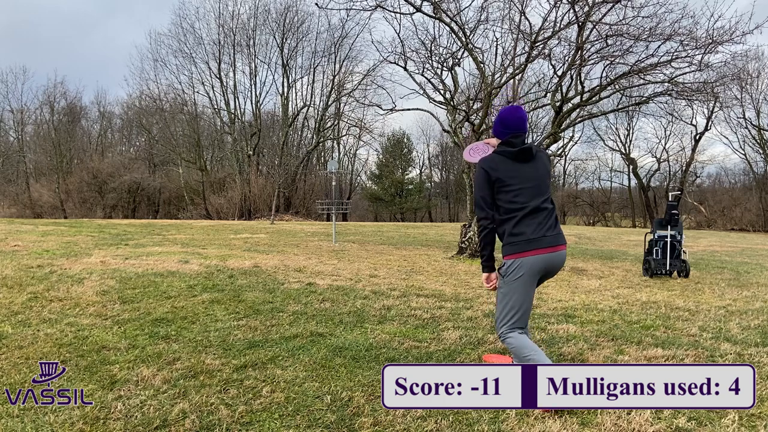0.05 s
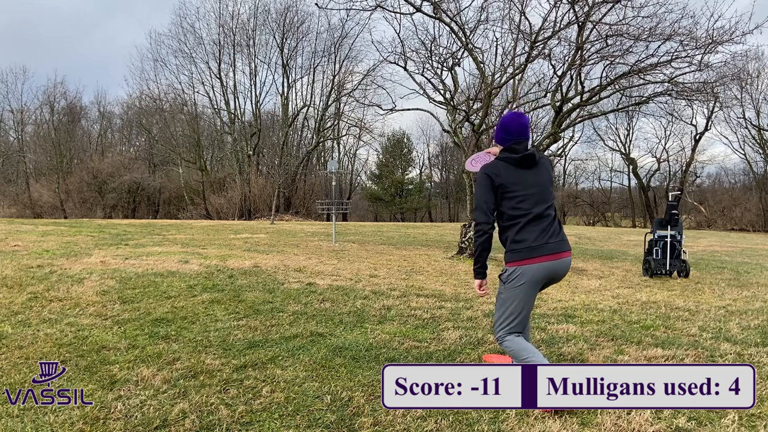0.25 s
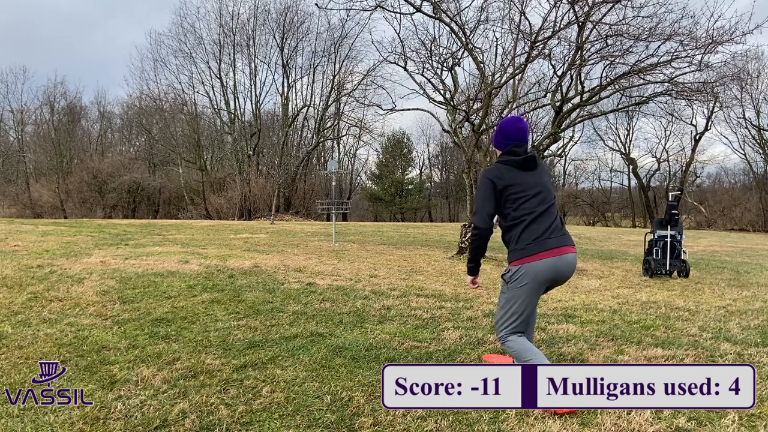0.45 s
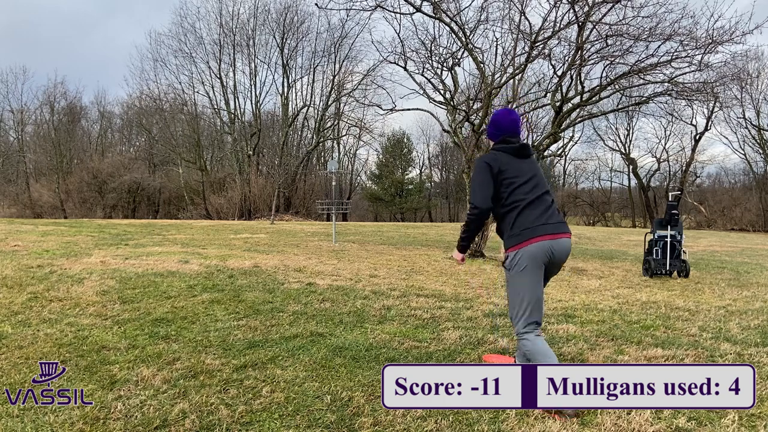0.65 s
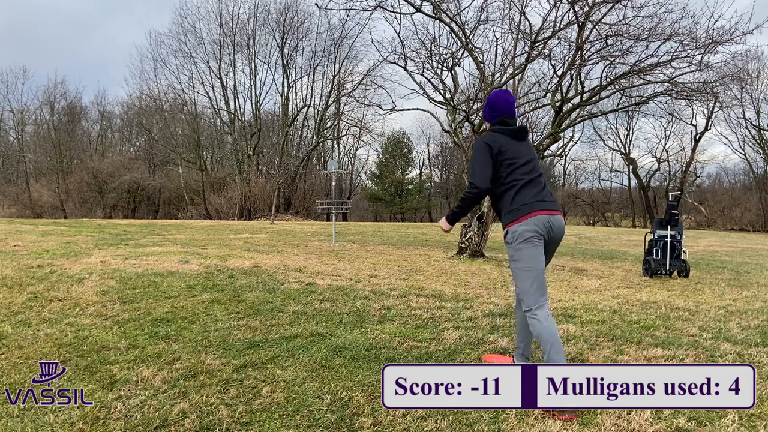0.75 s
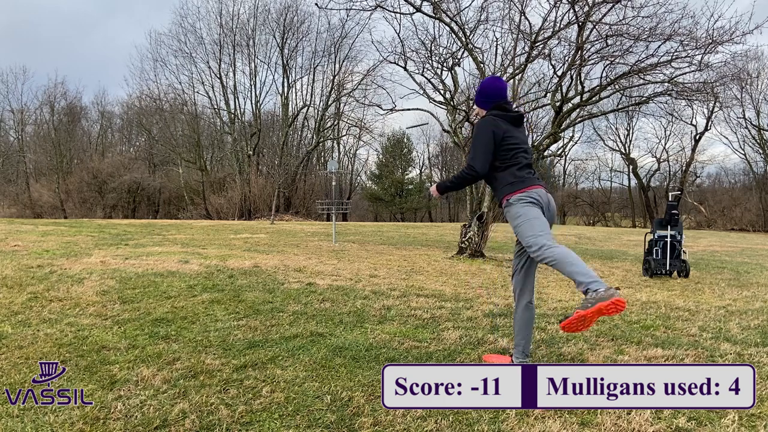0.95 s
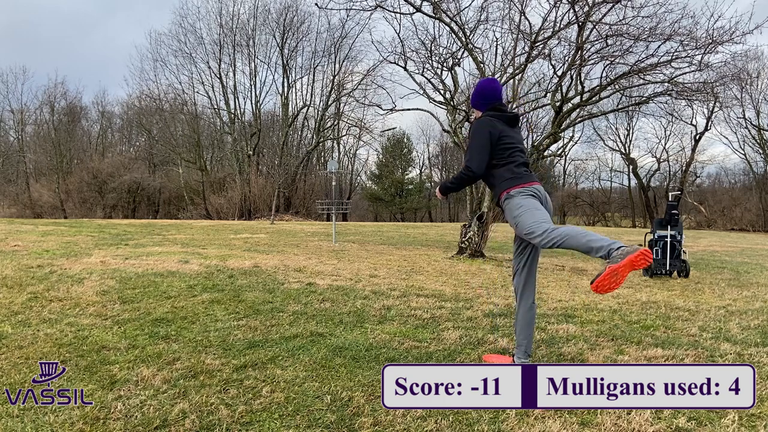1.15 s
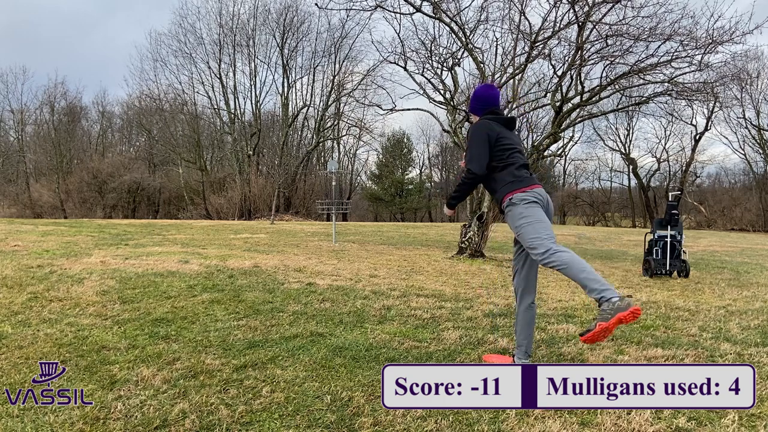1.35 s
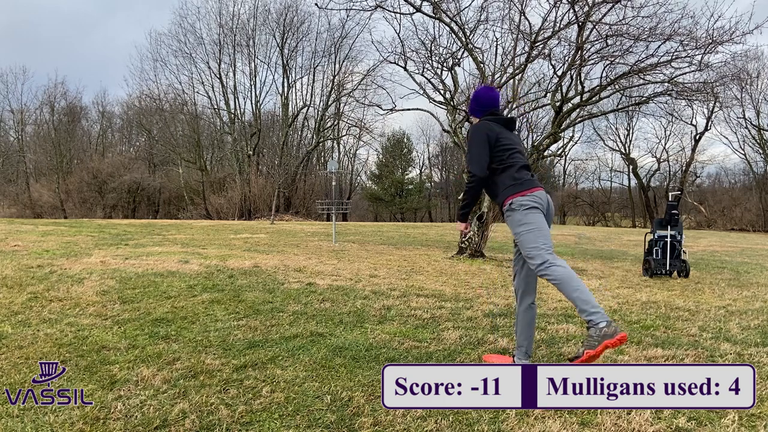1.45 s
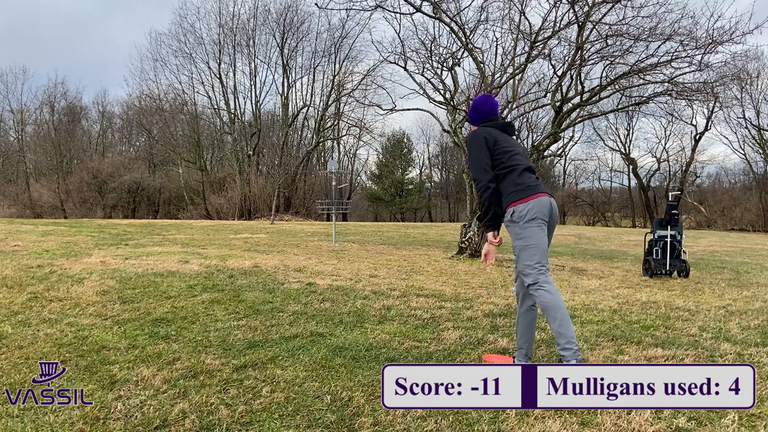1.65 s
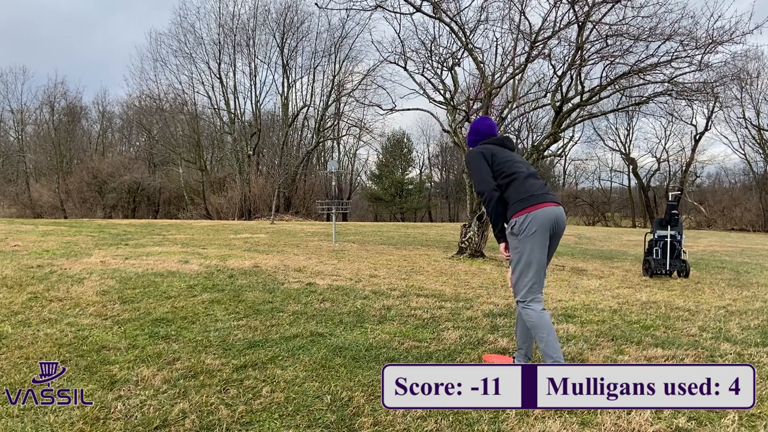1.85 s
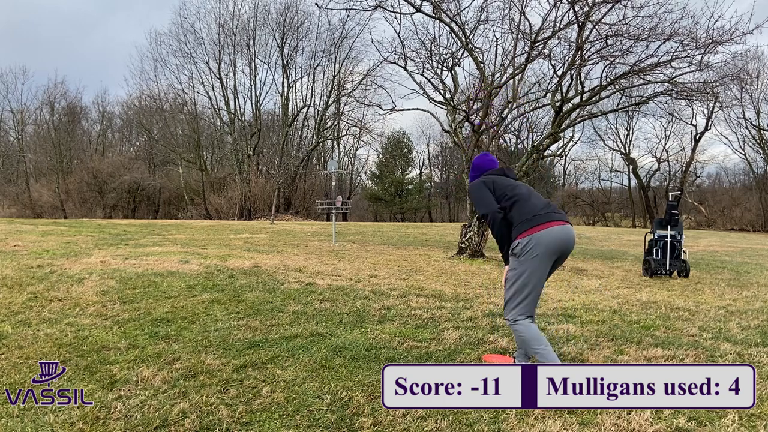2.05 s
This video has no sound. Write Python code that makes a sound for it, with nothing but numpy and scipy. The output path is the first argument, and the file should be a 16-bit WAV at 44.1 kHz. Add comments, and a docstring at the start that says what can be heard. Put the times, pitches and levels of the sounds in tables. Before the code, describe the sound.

A plastic disc hitting the chains of a metal basket is the main sound. From the start, wind rumbles on the microphone in an open field. The thrower's clothes rustle and tick faintly from about 0.6 to 1.2 seconds. At about 1.7 seconds the disc thuds into the chains some way off; they clatter and jingle, the pole rings, and lighter clinks continue until about 2.1 seconds.

```python
"""A thrown disc hits the chains of a metal basket some way off in an open field.
From the start, wind rumbles on a microphone with two ports (openings for sound). The thrower's
clothes brush softly, then rustle and tick faintly. At about 1.7 seconds the plastic disc thuds
into the chains. The links knock together, so they clatter, jingle and clink, and a moment
later they strike the pole and make it ring."""
import sys
import numpy as np
from scipy import signal
from scipy.fft import rfft, irfft
from scipy.io import wavfile
from scipy.ndimage import uniform_filter1d

SR = 44100
rng = np.random.default_rng(int(sys.argv[2]) if len(sys.argv) > 2 else 0)


def master_out(mix):
    """Clip the mix to full scale and print it as 16-bit PCM to the path in sys.argv[1]."""
    frames = np.transpose(np.atleast_2d(mix))
    ceiling = np.clip(frames, -1, 1)
    pcm = np.round(ceiling * 32767).astype(np.int16)
    wavfile.write(sys.argv[1], SR, pcm)


N = 92610
HIT_S = 1.7185
JINGLE_PER_S, JINGLE_SPREAD_DB = 220, 0.5

# The disc's firm knocks. Each row: start in seconds, relative level in dB.
FIRM_KNOCKS = [(1.7192, -23.5), (1.7444, -21.5), (1.771, -22.5), (1.781, -22), (1.811, -38)]
# How hard the links jostle. Each row: time in seconds, clatter gain in dB, jingle gain in dB.
JOSTLE = [(1.717, -37, -56), (1.723, -43.5, -55), (1.731, -40, -33), (1.745, -37, -48), (1.765, -39.5, -30),
          (1.775, -34, -26.5), (1.805, -45, -24), (1.879, -48, -38.5), (1.907, -53, -36.5),
          (2.011, -58.5, -43.5), (2.021, -54, -32), (2.049, -53, -42), (2.063, -48.5, -33),
          (2.073, -41, -37), (2.085, -48.5, -34), (2.1, -40, -34)]


def amp(db):
    return 10 ** (np.asarray(db) / 20)


def unit_level(x):
    """Scale a sound so that its average power is 1."""
    return x / np.sqrt(np.mean(x ** 2) + 1e-20)


def gain_curve(table, column=1):
    """Join a table's dB values with straight lines in time and turn them into a gain."""
    rows = np.array(table)
    return amp(np.interp(np.arange(N) / SR, rows[:, 0], rows[:, column]))


def colour(x, points):
    """Shape the tone. Each point: frequency in Hz, gain in dB."""
    hz, db = np.transpose(points)
    log_hz = np.log(np.fft.rfftfreq(N, 1 / SR) + 1)
    return irfft(rfft(x) * amp(np.interp(log_hz, np.log(hz + 1), db)), N)


def ring(hz, db, fade_s, rise_s=.0004):
    """A struck tone: it swells during the contact, then falls 60 dB in its fade time."""
    t = np.arange(SR // 2) / SR
    onset = 1 - np.exp(-t / rise_s)
    return onset * amp(db - 60 * t / max(fade_s, .0001)) * np.sin(2 * np.pi * hz * t)


def knocks(per_s, spread_db):
    """Clicks at random times; a wider spread makes a few stand out."""
    size = amp(spread_db * np.minimum(rng.exponential(1, N), 4)) * rng.choice([-1., 1.], N)
    return unit_level(size * (rng.random(N) < per_s / SR))


def after_hit():
    return np.arange(N) >= HIT_S * SR


def wind():
    """Air blows over both ports as slightly patchy noise, and its rumble follows the gusts."""
    # Tone of the noise both ports share. Each row: frequency in Hz, gain in dB.
    shared_tone = [(12, -51), (20, -44), (48, 0.5), (114, -1.5), (151, -11.5), (243, -18), (265, -19.5),
                   (392, -25.5), (491, -26), (534, -28), (581, -26), (962, -27.5), (1390, -36.5),
                   (2430, -44.5), (2720, -50), (12000, -60.5), (16400, -70)]
    # Tone of the noise that pushes one port and pulls the other, with the same columns.
    opposed_tone = [(12, -65), (20, -20), (36, -9), (65, 3), (128, -7.5), (331, -18.5), (360, -16.5),
                    (403, -14.5), (1080, -12.5), (2880, -47.5), (5330, -58), (7060, -61), (8590, -55),
                    (13800, -65), (16400, -78)]
    # The gusts. Each row: time in seconds, rumble level in dB (steady_db means no change).
    gusts = [(0.0, -40), (0.22, -48), (0.24, -39.5), (0.39, -49.5), (0.44, -32), (0.5, -36.5), (0.52, -37),
             (0.57, -58), (0.6, -44), (0.71, -42), (0.83, -48.5), (0.86, -38), (0.95, -45.5), (1.08, -46),
             (1.11, -36), (1.15, -43), (1.43, -42), (1.44, -48), (1.78, -39.5), (1.81, -46), (1.85, -36.5),
             (1.89, -47.5), (2.02, -39), (2.1, -45)]
    steady_db, rumble_top_hz = -43, 207
    lowpass = signal.butter(2, rumble_top_hz, fs=SR, output="sos")
    frames = N // 256 + 5
    patches = uniform_filter1d(rng.standard_normal((513, frames)), 10, 0)  # smooth across pitch
    patches = unit_level(uniform_filter1d(patches, 12, 1))  # and across time
    layers = []
    for tone, db in ((shared_tone, -43), (opposed_tone, -53)):
        spectra = rng.standard_normal((frames, 513)) + 1j * rng.standard_normal((frames, 513))
        noise = signal.istft(spectra.T * amp(0.5 * patches), nperseg=1024, noverlap=768)[1][:N]
        air = amp(db) * unit_level(colour(noise, tone))
        rumble = signal.sosfiltfilt(lowpass, air)
        layers.append(air + rumble * (gain_curve(gusts) / amp(steady_db) - 1))
    shared, opposed = layers
    return np.array([shared + opposed, shared - opposed])


def clothes():
    """Moving cloth makes a soft brushing, then a thin rustle and a few dry ticks."""
    # Tone of the rustle. Each row: frequency in Hz, gain in dB.
    cloth_tone = [(1500, 6), (2800, 7), (5000, -1), (7000, 0), (10000, -2), (15000, 2.5), (16500, -10)]
    # Loudness of the rustle. Each row: time in seconds, level in dB.
    rustle_levels = [(.2, -99), (.58, -93), (.64, -72), (.7, -73), (.74, -78), (.79, -64.5), (.85, -80),
                     (.9, -93), (2.1, -90)]
    # Ticks and scuffs. Each row: start in seconds, peak level in dB, pitch in Hz.
    ticks = [(.6405, -57, 14500), (0.646, -50, 2600), (.659, -55, 9000), (.6655, -48, 13000),
             (.691, -45.5, 6600), (.6915, -57, 13000), (.778, -58, 2600), (.787, -57, 2900),
             (.934, -40, 12400), (.9505, -55, 11000), (.9535, -55, 11000), (1.118, -58, 13500),
             (1.1566, -42, 11000)]
    rustle = unit_level(colour(knocks(per_s=3000, spread_db=3), cloth_tone)) * gain_curve(rustle_levels)
    brush = signal.fftconvolve(rng.standard_normal(N), ring(hz=2830, db=0, fade_s=0.006))[:N]
    brush_fade = np.clip((0.14 - np.arange(N) / SR) / 0.047, 0, 1)  # gone by 0.14 seconds
    out = rustle + amp(-77) * unit_level(brush) * brush_fade
    for s, db, hz in ticks:
        tick = ring(hz, 0, fade_s=5.4 / hz, rise_s=1 / SR)
        out[round(s * SR):][:len(tick)] += amp(db) * tick / tick.max()
    return out


def disc():
    """Many small rubbing knocks and a few firm ones make the plastic disc ring."""
    # The disc's own tones. Each row: pitch in Hz, relative level in dB, fade time in seconds.
    tones = [(1037, 1, .07), (1145, -1, .06), (1300, -8, .02), (1700, -8, .025), (2200, -8, .015)]
    # How hard it rubs into the chains. Each row: time in seconds, gain in dB.
    rubbing = [(1.717, -25), (1.721, -34.5), (1.745, -29.5), (1.787, -35), (1.809, -46.5), (1.985, -58),
               (2.1, -56)]
    body = sum(ring(*tone) for tone in tones)
    force = amp(-3.5) * knocks(per_s=710, spread_db=3) * gain_curve(rubbing) * after_hit()
    force /= np.linalg.norm(body)
    for s, db in FIRM_KNOCKS:
        force[round(s * SR)] += amp(db) / 2
    return signal.fftconvolve(force, body)[:N]


def thud():
    """Each firm knock of the disc also has a faint, dull low part."""
    out = np.zeros(N + SR)
    for s, db in FIRM_KNOCKS:
        hz = 384 * rng.uniform(0.76, 1.294)
        out[round(s * SR):][:SR // 2] += ring(hz, db - 20.5, fade_s=0.054)
    return out[:N]


def clatter():
    """Tiny collisions between links give bright, blurred clicks and short pings."""
    # Tone of the clatter. Each row: frequency in Hz, gain in dB.
    tone = [(700, -9), (1100, -3.5), (2500, -1.5), (5000, 1), (7500, -3.5), (10000, -3.5), (13000, -1),
            (15000, -7), (16500, -19)]
    hits_per_s, click_fade_s = 2500, 0.0097
    t = np.arange(SR // 10) / SR
    click = rng.standard_normal(len(t)) * amp(-60 * t / click_fade_s)
    clicks = signal.fftconvolve(knocks(hits_per_s, spread_db=1), click)[:N]
    pitches_hz = np.linspace(1186, 14970, 40) * rng.uniform(.97, 1.03, 40)
    pings = np.zeros(N)
    for hz in pitches_hz:
        hits = knocks(hits_per_s / len(pitches_hz), spread_db=1)
        pings += signal.fftconvolve(hits, ring(hz, 0, fade_s=.025))[:N]
    mix = unit_level(clicks) + amp(-8.5) * unit_level(pings)
    return amp(8.5) * unit_level(colour(mix, tone)) * gain_curve(JOSTLE) * after_hit()


def chain_touches():
    """The swinging chains tap at random, as hard as the links jostle."""
    return knocks(JINGLE_PER_S, JINGLE_SPREAD_DB) * gain_curve(JOSTLE, column=2) * after_hit()


def jingle():
    """Each tone of the links is struck again and again while the chains swing."""
    # The links' own tones. Each row: pitch in Hz, relative level in dB, fade time in seconds.
    tones = [(4950, -23, .08), (5071, -20, .15), (5950, -24, .1), (6901, -21, .15), (9140, -11, .1),
             (9330, -13, .08), (11345, -18, .12), (11790, -11, .1), (11895, -12, .1), (11979, 0, .16),
             (12028, -2, .12), (12072, -6, .12), (12113, -1, .14), (12152, -7, .12), (12826, -4, .15),
             (12873, -8, .1), (13945, -13, .1), (14050, -9, .14)]
    ringing = sum(signal.fftconvolve(chain_touches(), ring(*tone))[:N] for tone in tones)
    strongest_tone = ring(*tones[9])
    return amp(-1) * ringing / np.linalg.norm(strongest_tone)


def clinks():
    """Links clink with a clear pitch, and one strike makes the pole's high tones ring."""
    # Tones of links and pole. Each row: start in seconds, level in dB, pitch in Hz, fade in seconds.
    tones = [(1.7185, -20, 1890, 0.011), (1.7185, -44, 5160, .015), (1.735, -23, 5240, 0.036),
             (1.745, -29, 2270, 0.027), (1.7737, -19, 5540, 0.016), (1.788, -22, 4000, 0.015),
             (1.8387, -25, 9172, .16), (1.8387, -29, 9104, .12), (1.8387, -29, 9250, .1),
             (1.8387, -27, 9400, .06), (1.892, -33, 9200, .04), (2.073, -28, 9250, .04),
             (1.8375, -27, 3640, .03), (1.839, -29, 4570, 0.015), (1.8386, -24.5, 4140, 0.035),
             (1.845, -39, 5071, 0.42), (1.851, -31.5, 6901, 0.05), (1.92, -34, 6700, 0.043),
             (1.935, -42, 6930, 0.25), (2.011, -45, 5080, 0.14), (2.0655, -25, 5580, 0.024),
             (2.0655, -21, 10540, 0.016), (2.069, -33.5, 2230, 0.028), (2.0725, -23.5, 5600, 0.011),
             (2.0725, -20.5, 6650, 0.011), (1.7308, -28, 12060, .08), (1.7737, -18, 12100, 0.11),
             (1.9087, -25, 11880, 0.068), (2.0209, -25, 12120, 0.046), (2.0605, -23, 12000, 0.047)]
    out = np.zeros(N + SR)
    for s, db, hz, fade_s in tones:
        out[round(s * SR):][:SR // 2] += ring(hz, db, fade_s)
    return out[:N]


def pole():
    """Links hit the pole with a crack and make it ring; light touches keep it ringing."""
    # The pole's own tones. Each row: pitch in Hz, relative level in dB, fade time in seconds.
    tones = [(3277, 0, .33), (3348, -12, .14), (3390, -17, .1), (3445, -18, .08), (9104, -12, .15),
             (9172, -8, .18), (9206, -13, .15), (9276, -12, .12), (9400, -14, .1), (9615, -18, .1)]
    # Links striking the pole. Each row: start in seconds, gain in dB.
    clanks = [(1.756, -38), (1.7737, -18), (1.7844, -25.5), (1.8381, -29.5), (2.004, -45.5), (2.03, -47),
              (2.08, -41)]
    out, t = np.zeros(N + SR), np.arange(SR // 2) / SR
    body = sum(ring(*tone) for tone in tones)
    for s, db in clanks:
        bright_noise = np.diff(rng.standard_normal(len(t) + 1))
        crack = bright_noise * amp(-5) * np.exp(-t / 0.012)
        out[round(s * SR):][:len(t)] += amp(db) * (body + crack)
    light_ringing = signal.fftconvolve(chain_touches(), body / np.linalg.norm(body))[:N]
    return out[:N] + amp(-11) * light_ringing


def ports(x):
    """The two ports hear a sound slightly out of step, each with a little scattered sound."""
    # How far the left port leads for sound from ahead. Each row: frequency in Hz, phase in radians.
    left_lead = [(0, 0), (1900, .1), (3100, .9), (4400, .85), (5250, 1.45), (7200, 0), (8800, -3.1),
                 (11100, -6.28), (13350, -9.4), (15200, -12.5), (22050, -12.57)]
    scatter_db, scatter_fade_s = -18, 0.079
    hz, lead = np.transpose(left_lead)
    half_shift = np.exp(.5j * np.interp(np.fft.rfftfreq(2 * N, 1 / SR), hz, lead))
    direct = irfft(rfft(x, 2 * N) * np.array([half_shift, half_shift.conj()]), 2 * N)[:, :N]
    t = np.arange(SR // 20) / SR
    scatter = rng.standard_normal((2, len(t))) * amp(-60 * t / scatter_fade_s)
    scatter *= amp(scatter_db) / np.linalg.norm(scatter[0])
    return direct + signal.fftconvolve(x[None], scatter, axes=1)[:, :N]


def scene():
    """The basket with its bass cut, the thud and the clothes reach the ports; wind adds on top."""
    basket = disc() + clatter() + jingle() + pole() + clinks()
    bass_cut_hz = 906
    thin_basket = signal.sosfilt(signal.butter(4, bass_cut_hz, "high", fs=SR, output="sos"), basket)
    return ports(thin_basket + thud() + clothes()) + wind()


def record(dry):
    """Cut away the very highest treble."""
    top_hz = 15900
    lowpass = signal.firwin(255, top_hz, window=("kaiser", 9), fs=SR)
    return signal.oaconvolve(dry, lowpass[None], "same")


dry = scene()
out = record(dry)
master_out(out)
```